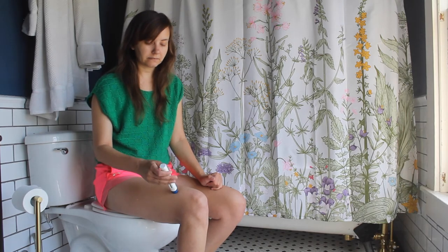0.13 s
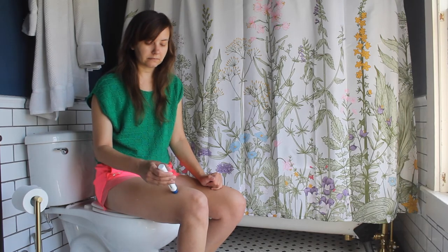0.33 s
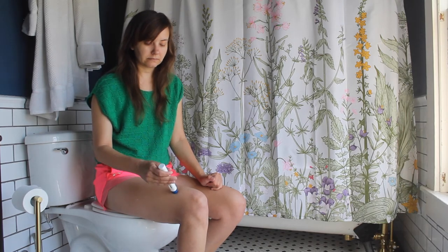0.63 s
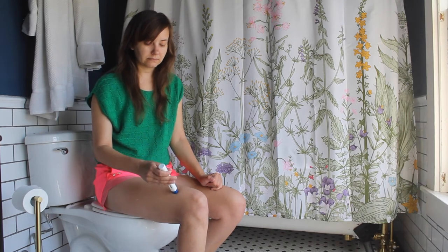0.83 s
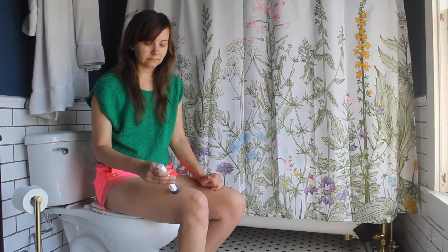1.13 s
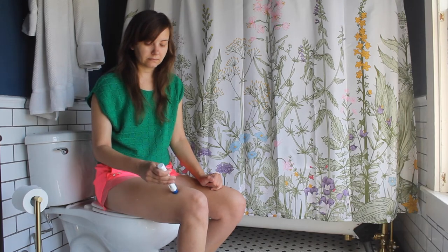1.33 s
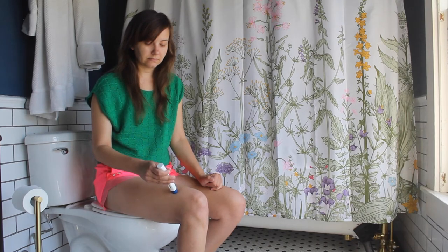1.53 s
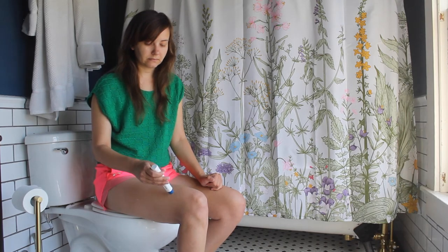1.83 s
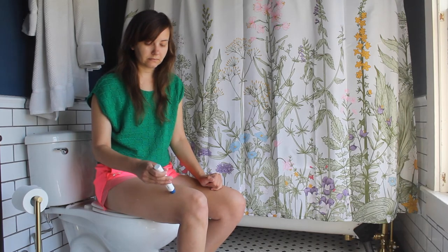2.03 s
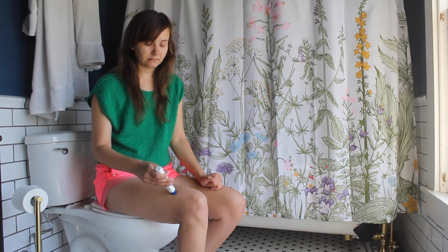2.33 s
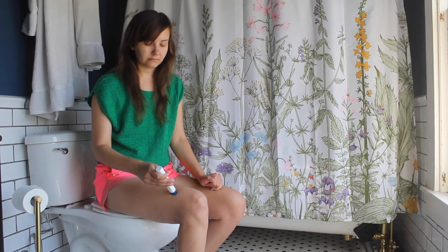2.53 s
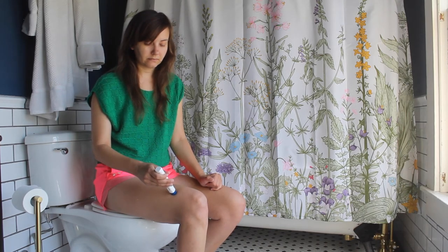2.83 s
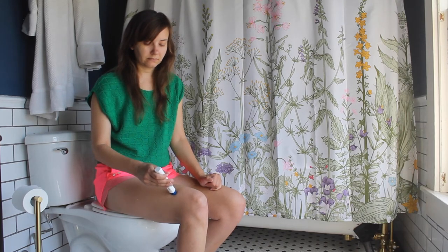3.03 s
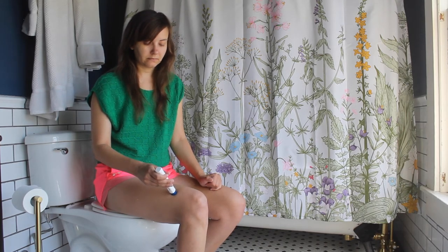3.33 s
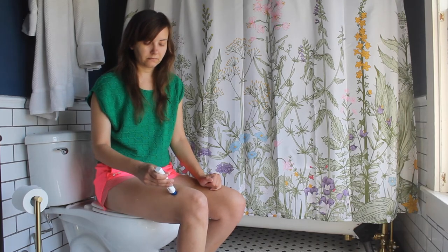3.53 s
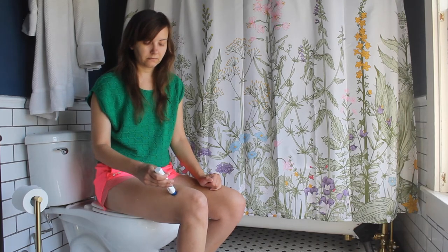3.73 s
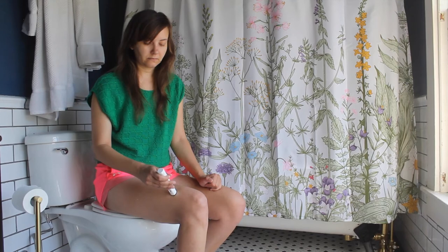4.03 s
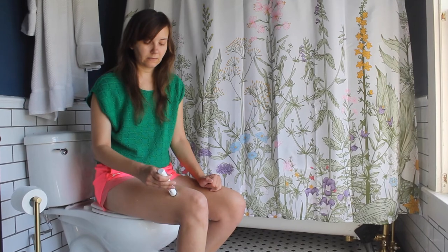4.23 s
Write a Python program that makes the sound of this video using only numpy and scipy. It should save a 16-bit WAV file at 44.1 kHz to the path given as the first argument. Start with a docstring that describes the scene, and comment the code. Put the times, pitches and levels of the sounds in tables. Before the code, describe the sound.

Long near-silence with soft airy fan noise and weak wavering tones. Late on, an autoinjector pressed to a thigh fires: a faint trigger knock merges into a sharp, explosive click with a slight low thump. Hard tiled walls return quick echoes and a short tail. About half a second later comes a minute, high double tick. Sounds like a close microphone in a small bathroom.

```python
"""Autoinjector in a bathroom

A spring-loaded autoinjector is fired against a thigh in a small, quiet tiled bathroom. The trigger gives with
a soft knock, the plunger slides with a rasp of shaped noise and slams into its stop. Tiny runs of impacts make
the plastic barrel ring, and echoes with a noise tail form the tiles' answer. A tiny double tick follows.
A distant fan, made of shaped noise and wavering tones, hums faintly throughout; its low drone swells early on."""
import sys
import numpy as np
from scipy import signal
from scipy.fft import rfft, irfft
from scipy.io import wavfile

SR = 44100
rng = np.random.default_rng(int(sys.argv[2]) if len(sys.argv) > 2 else 0)


def wav_out(sig):
    """Save sig, one row per channel (or a flat mono array), as 16-bit PCM at SR to the path in sys.argv[1]."""
    wavfile.write(sys.argv[1], SR, np.round(np.clip(np.atleast_2d(sig).T, -1, 1) * 32767).astype(np.int16))


N = 193907


def from_db(db):
    """Turn decibels into a gain."""
    return 10 ** (np.asarray(db) / 20)


def rms_one(x):
    """Scale a sound to an rms (average strength) of 1."""
    return x / np.sqrt(np.mean(x ** 2) + 1e-20)


def energy_one(x):
    """Scale a sound to a total energy of 1."""
    return x / np.sqrt(np.sum(x ** 2) + 1e-20)


def at_hz(points, hz):
    """Read a table between its points, on a log-frequency axis."""
    knots, values = np.transpose(points)
    return np.interp(np.log(np.maximum(hz, 1)), np.log(knots), values)


def add(track, start_s, sound):
    """Mix a sound into a track, cut off at the track's end."""
    start = round(start_s * SR)
    track[start:start + len(sound)] += sound[:N - start]


def coloured_noise(spectrum, peaks=(), ripple_db=0, ripple_hz=14):
    """Steady noise with a spectrum, resonant peaks and the fine ripple of a room's standing waves; rms 1."""
    hz = np.arange(N // 2 + 1) * SR / N
    ripple = np.interp(hz / ripple_hz, np.arange(SR), rng.standard_normal(SR))
    # the ripple is weaker in the bass
    level_db = at_hz(spectrum, hz) + ripple_db * ripple * hz / (hz + 300)
    for centre_hz, width_hz, peak_db in peaks:
        level_db += peak_db / (1 + (2 * (hz - centre_hz) / width_hz) ** 2)
    white = rfft(rng.standard_normal(N))
    return rms_one(irfft(white * from_db(level_db), N))


def tone(pitch_hz, waver_hz=2.5, waver_per_s=14):
    """A tone that wavers a little in pitch; rms 1."""
    wander = np.interp(np.arange(N) / SR * waver_per_s, np.arange(SR), rng.standard_normal(SR))
    cycles = np.cumsum(pitch_hz + waver_hz * wander) / SR
    return np.sqrt(2) * np.sin(2 * np.pi * (cycles + rng.random()))


# blows inside the pen, trigger first, stop last: start_s, level_db, chatter_s, brightness_hz
BLOWS = [(3.7654, -23.5, .0001, 1200), (3.8136, 0.5, .00024, 17000)]
# resonances of the plastic barrel and spring: pitch_hz, width_hz (of each of two stages), peak_db
BARREL_MODES = [(290, 375, 5.5), (1140, 364, 24.5), (1296, 367, 26.5), (2207, 280, 18.5), (2720, 550, 11),
                (3627, 390, 18), (4100, 230, 15.5), (5070, 1400, 18.5), (6574, 360, 19.5),
                (8040, 1100, 23.5), (9320, 1200, 14), (10790, 490, 17.5), (13550, 960, 7),
                (14080, 2400, 18)]


def blows(crack_db=1, crack_hz=450):
    """Each blow gives a broad crack and sets the barrel ringing; neighbouring modes swing in opposite directions."""
    out = np.zeros(N)
    crack_filter = signal.butter(1, crack_hz, "high", fs=SR, output="sos")
    for start_s, level_db, chatter_s, brightness_hz in BLOWS:
        force = chatter(chatter_s)
        crack = from_db(crack_db) * signal.sosfilt(crack_filter, force)
        barrel = np.zeros(len(force))
        for k, (pitch_hz, width_hz, peak_db) in enumerate(BARREL_MODES):
            barrel += (-1) ** k * from_db(peak_db) * resonate(force, pitch_hz, width_hz)
        # a soft blow leaves the high modes quiet
        softness = signal.butter(2, brightness_hz, fs=SR, output="sos")
        add(out, start_s, from_db(level_db) * signal.sosfilt(softness, barrel + crack))
    return out


def chatter(chatter_s, bounce=0.41, count=3):
    """A blow bounces between close-fitting parts: a dense run of tiny impacts with an even spectrum."""
    force = signal.unit_impulse(SR // 10)
    gaps_s = chatter_s * np.linspace(.5, 1.5, count) * rng.uniform(.85, 1.15, count)
    for gap_s in gaps_s:
        between = np.zeros(round(gap_s * SR))
        # an all-pass filter: it spreads the blow in time but keeps all pitches equally strong
        force = signal.lfilter(np.r_[-bounce, between, 1], np.r_[1, between, -bounce], force)
    return force


def resonate(force, pitch_hz, width_hz):
    """A heavily damped resonance with steep flanks: it swells for a cycle or two and dies; gain 1 at its peak."""
    r = np.exp(-np.pi * width_hz / SR)
    angle = 2 * np.pi * pitch_hz / SR
    stage = [(1 - r * r) / 2, 0, (r * r - 1) / 2, 1, -2 * r * np.cos(angle), r * r]
    return signal.sosfilt([stage, stage], force + 1e-18)


# colour of the sliding noise: pitch_hz, relative_level_db
SLIDE_COLOUR = [(300, 3.5), (700, -10), (1200, 9), (1900, -7), (2800, -2), (3500, -5.5), (5600, -4.5),
                (6800, 11.5), (8500, 1.5), (11000, 0.5), (15500, -9)]
SLIDE_DB, SLIDE_ATTACK_S, SLIDE_SAG_DB_PER_S = -50, 0.016, 190.5


def plunger():
    """The spring drives the plunger to its stop: friction builds up, then eases as the spring unloads."""
    release_s, stop_s = BLOWS[0][0], BLOWS[-1][0]
    t = np.arange(N) / SR - release_s
    grip = np.sqrt(np.clip(t / SLIDE_ATTACK_S, 0, 1)) * (t < stop_s - release_s)
    friction_db = SLIDE_DB - SLIDE_SAG_DB_PER_S * np.maximum(t - SLIDE_ATTACK_S, 0)
    return grip * from_db(friction_db) * coloured_noise(SLIDE_COLOUR)


THUD_PEAK_S, THUD_DB = 0.0042, -40.5   # time to the peak of the push, and its peak level
BOOM_HZ, BOOM_T60_S, BOOM_DB = 48.16, 1.2, -49.5   # lowest standing wave; T60 = time to fall 60 dB


def thud():
    """The main blow jolts the thigh: one soft push that leaves a faint low standing wave in the room."""
    out, t = np.zeros(N), np.arange(SR) / SR
    push = from_db(THUD_DB) * t / THUD_PEAK_S * np.exp(1 - t / THUD_PEAK_S)
    fade = from_db(-60 * t / BOOM_T60_S)
    standing_wave = from_db(BOOM_DB) * np.sin(2 * np.pi * BOOM_HZ * t) * fade
    add(out, BLOWS[-1][0], push + standing_wave)
    return out


# small ticks of the mechanism: start_s, level_db (total energy)
TICKS = [(4.2544, -34), (4.2571, -32.5)]
# colour of the ticks: pitch_hz, relative_level_db
TICK_COLOUR = [(2000, -4), (5500, -15), (8000, -9), (11000, -2), (13000, 7), (14200, -3), (16000, -6)]


def ticks(fall_s=0.00064):
    """A small part snaps into place with a thin, high double tick: two very short noise bursts."""
    out, t = np.zeros(N), np.arange(SR // 10) / SR
    for start_s, level_db in TICKS:
        burst = np.sqrt(t) * np.exp(-t / fall_s) * coloured_noise(TICK_COLOUR)[:len(t)]
        add(out, start_s, from_db(level_db) * energy_one(burst))
    return out


# first echoes from floor and walls: delay_s, level_db (against the direct sound)
ECHOES = [(.0044, -11.5), (0.0132, -18), (0.0154, -20), (0.0221, -21.5)]
# strength of the room's dense tail: pitch_hz, level_db (against the direct sound)
ROOM_GAIN = [(100, -0.5), (250, -12.5), (650, 4.5), (850, -3.5), (1050, -8), (1230, -13), (1500, -6),
             (2300, 3), (4000, -7), (6500, -2), (8200, 0), (11000, -0.5), (14000, 1.5), (16000, -7.5)]
# how long the tail takes to fall by 60 dB: pitch_hz, fall_s
ROOM_T60 = [(100, 0.75), (500, 0.36), (1200, 0.39), (2500, 0.31), (5000, 0.29), (8200, 0.3), (11000, 0.22),
            (15000, 0.16)]


def bathroom(x, build_s=0.0017):
    """Direct sound, a few hard echoes, then a dense tail whose treble dies first."""
    t = np.arange(SR) / SR
    hz = np.arange(SR // 2 + 1)
    white = rfft(rng.standard_normal(SR))
    build_up = 1 - np.exp(-(t / build_s) ** 2)
    edges = np.geomspace(70, 18000, 49)
    response = np.zeros(SR)
    for low, high in zip(edges, edges[1:]):
        centre = np.sqrt(low * high)
        decay = from_db(-60 * t / at_hz(ROOM_T60, centre))
        band = irfft(white * ((hz >= low) & (hz < high)), SR) * decay * build_up
        # each band's energy follows its share of the spectrum
        share = np.sqrt(2 * (high - low) / SR)
        response += from_db(at_hz(ROOM_GAIN, centre)) * share * energy_one(band)
    response[0] += 1   # direct sound
    for delay_s, echo_db in ECHOES:
        response[round(delay_s * SR)] += from_db(echo_db)
    return signal.fftconvolve(x, response)[:N]


# colour of the fan and room air: pitch_hz, relative_level_db
AIR_COLOUR = [(12, -27.5), (20, 7), (76, -6.5), (124, -8.5), (347, -16), (457, -14.5), (497, -15.5),
              (587, -16.5), (914, -15), (1240, -8), (1780, -17.5), (2280, -14), (3180, -23.5),
              (13100, -37.5), (15000, -40.5)]
AIR_DB = -62.5   # rms
# resonances of the fan housing: pitch_hz, width_hz, peak_db
FAN_PEAKS = [(2812, 170, 2), (3013, 120, -2.5), (4070, 180, 5), (4910, 140, 3.5), (5900, 700, -1),
             (6750, 170, 3)]
# fan tones: pitch_hz, level_db (rms)
FAN_TONES = [(183, -82), (492.6, -73.5), (788.3, -79), (1095, -91), (1278, -79), (1480, -79.5),
             (2331, -83.5), (2648, -83)]


def fan():
    """A soft rush of air, made of noise, with faint wavering tones and a low drone."""
    air = from_db(AIR_DB) * coloured_noise(AIR_COLOUR, FAN_PEAKS, ripple_db=3.0)
    hum = sum(from_db(level_db) * tone(pitch_hz) for pitch_hz, level_db in FAN_TONES)
    return air + hum + drone()


DRONE_HZ, DRONE_DB, SWELL_DB = 122.6, -83, -71   # steady level, and what the swell adds at its top (rms)
SWELL_AT_S, SWELL_ATTACK_S, SWELL_RELEASE_S = .2, .25, 0.31   # the swell tops out at SWELL_AT_S


def drone():
    """A low tone, already swelling at the start: a straight rise, then an exponential fall to a steady level."""
    t = np.arange(N) / SR - SWELL_AT_S
    rise = np.clip(1 + t / SWELL_ATTACK_S, 0, 1)
    fall = np.exp(-np.maximum(t, 0) / SWELL_RELEASE_S)
    return (from_db(DRONE_DB) + from_db(SWELL_DB) * rise * fall) * tone(DRONE_HZ)


def scene():
    """The pen in the bathroom, over the fan."""
    pen = blows() + plunger() + ticks()
    return (bathroom(pen) + thud() + fan())[None]


CUTOFF_HZ = 15750


def record(dry, top=1.2):
    """The highest peaks are rounded and the top of the spectrum is cut."""
    rounded = top * np.tanh(dry / top)
    treble_cut = signal.ellip(10, .1, 80, CUTOFF_HZ, fs=SR, output="sos")
    return signal.sosfilt(treble_cut, rounded)


dry = scene()
out = record(dry)
wav_out(out)
```